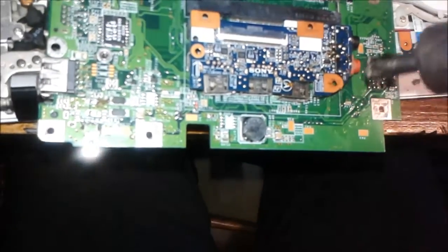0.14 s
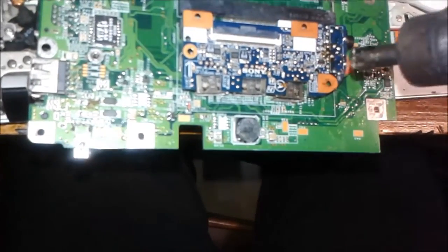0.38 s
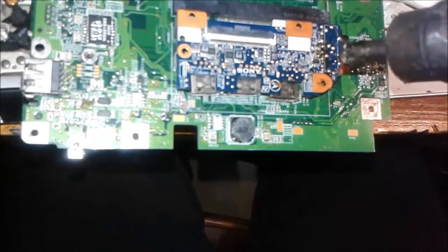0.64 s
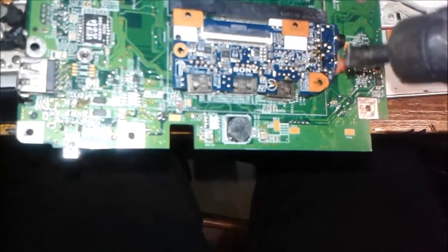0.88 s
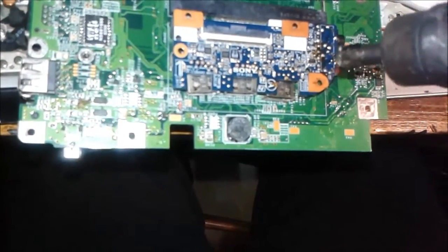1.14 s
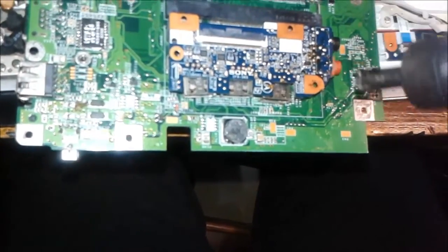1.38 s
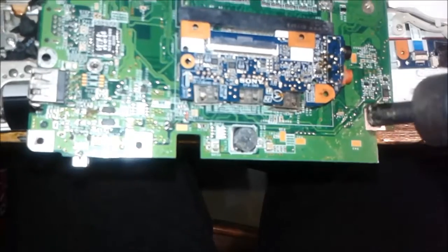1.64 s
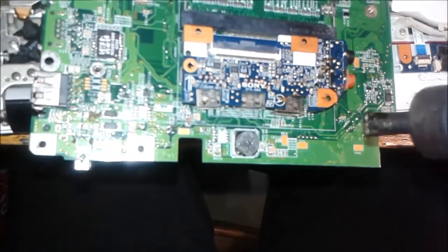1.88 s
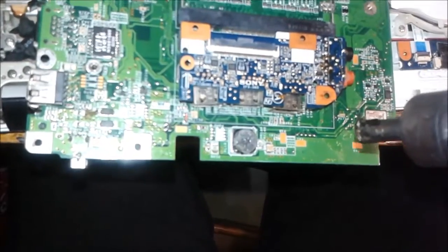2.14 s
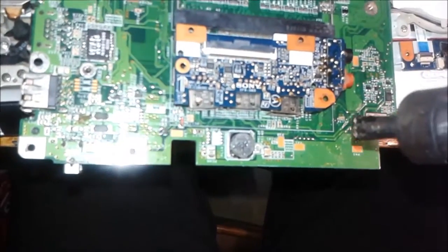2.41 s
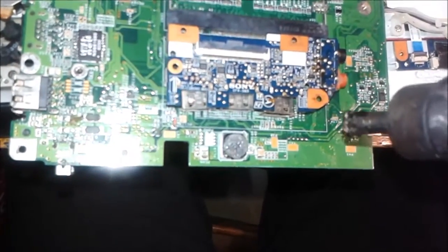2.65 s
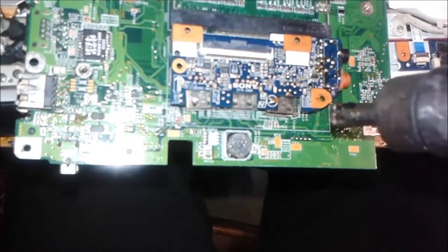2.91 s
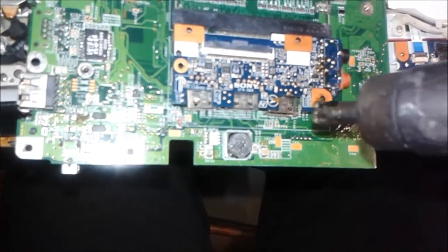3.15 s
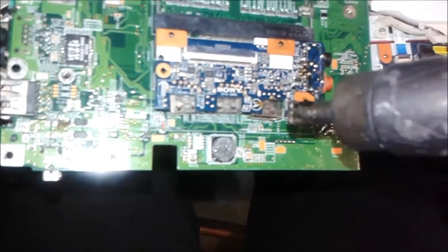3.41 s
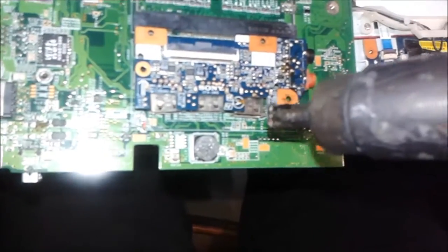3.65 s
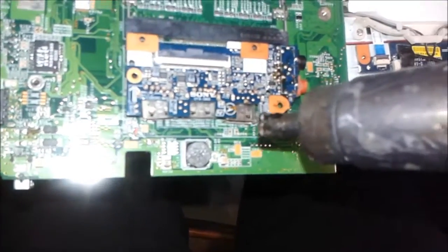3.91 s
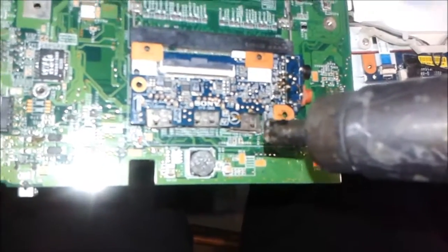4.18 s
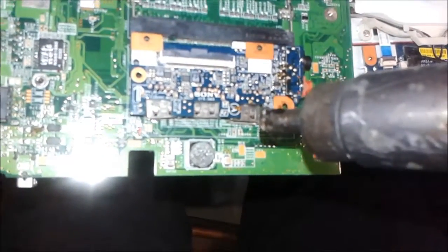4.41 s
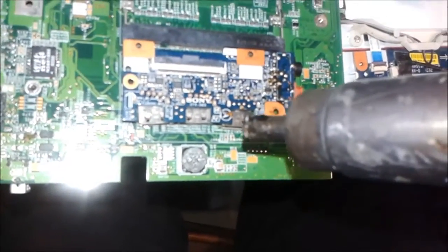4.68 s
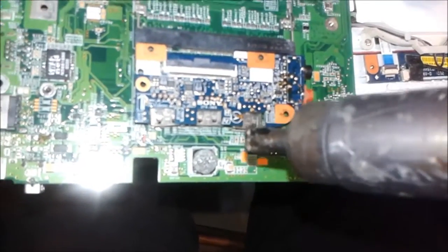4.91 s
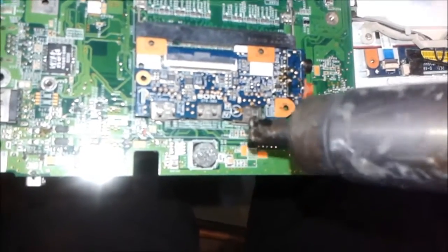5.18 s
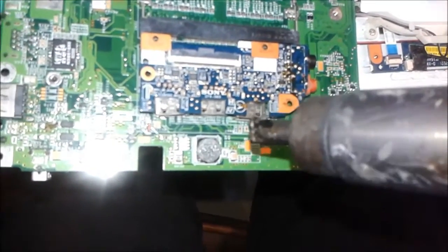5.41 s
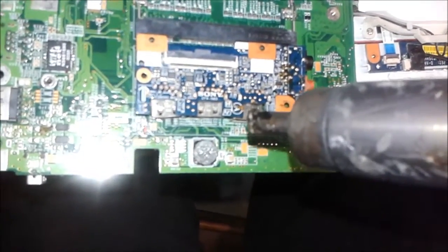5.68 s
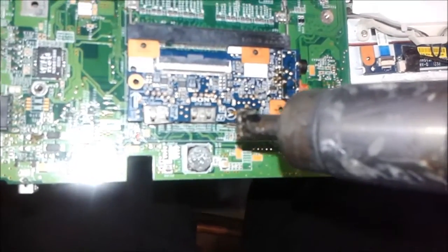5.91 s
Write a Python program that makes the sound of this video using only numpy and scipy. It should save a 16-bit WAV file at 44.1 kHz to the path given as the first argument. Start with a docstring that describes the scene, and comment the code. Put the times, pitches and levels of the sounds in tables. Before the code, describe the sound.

Constant airy rush and sharp hiss from a hot air blower, with deepening fan hum, thin whine, and increasingly frequent raspy buzzing bursts.

```python
"""Over a circuit board, close to a small microphone, a hot air gun is held in the hand. The unbalanced fan
in its handle hums at its turn rate and whines on higher multiples of it; turbulent air, modelled as coloured
noise, rushes through the housing and hisses at the nozzle and the board. As the hand moves in, the hum
grows, and with each tremble of the hand a loose part, struck once per turn of the fan, buzzes through its
resonances."""
import sys
import numpy as np
from scipy import signal
from scipy.fft import rfft, irfft, next_fast_len
from scipy.io import wavfile
from scipy.ndimage import uniform_filter1d, map_coordinates

SR = 44100
rng = np.random.default_rng(int(sys.argv[2]) if len(sys.argv) > 2 else 0)


def wav_record(signal):
    """Record a signal, one row per channel, as 16-bit PCM in the file named by sys.argv[1]."""
    frames = np.transpose(np.atleast_2d(signal))
    bounded = np.clip(frames, -1, 1)
    # unit amplitude maps onto the largest positive 16-bit level
    quanta = np.round(bounded * 32767).astype(np.int16)
    wavfile.write(sys.argv[1], SR, quanta)


def level_to_linear(level):
    """Convert decibel levels to linear amplitude factors, elementwise."""
    exponent = np.asarray(level, float) / 20
    return 10 ** exponent


N = 267113

# Levels are rms re full scale unless marked relative; a bell's length is its half-width at 1/e.

# colour of the rush through the housing: (frequency [Hz], relative density [dB per Hz])
RUSH_COLOUR = [(25, -31), (60, -19), (110, -6.5), (200, -8), (400, -8), (540, -4), (700, 0.5), (1150, -5.5),
               (1550, -2), (1950, -7.5), (2600, -5), (3200, -7), (4000, -19.5), (9000, -57)]
# colour of the jet leaving the nozzle: (frequency [Hz], relative density [dB per Hz])
JET_COLOUR = [(1500, -16.5), (2500, -1.5), (3400, -5.5), (4100, 2.5), (4800, -2.5), (5500, -4.5),
              (6500, -3), (9000, -61)]
# colour of the hiss where the jet meets the board: (frequency [Hz], relative density [dB per Hz])
HISS_COLOUR = [(4000, -39), (5000, -24), (5900, -9), (6300, -3), (6650, 5.5), (7200, -0.5), (7700, -10.5),
               (8500, -16), (9050, -21.5), (9500, -42.5), (12000, -19.5)]
# colour of a low draught that fades as the handle comes near: (frequency [Hz], relative density [dB per Hz])
DRAUGHT_COLOUR = [(120, -16), (220, -7), (520, -3.5), (800, -14.5)]
# air bands that shift as the handle comes near:
# (frequency [Hz], width per stage [Hz], level at the mean hum [dB], slope [dB per dB of hum])
AIR_SHIFTS = [(2754, 650, -55, 0.5), (3446, 300, -50, -.5), (5780, 630, -45.5, 1)]
# strength of the jet at the microphone as the nozzle sweeps the board: (time [s], relative level [dB])
NOZZLE_SWEEP = [(0, -1.5), (.22, -1.5), (.7, 1.5), (1.35, 2), (1.77, -1.5), (2.27, -3.5), (2.6, -2.5),
                (2.95, -2.5), (3.44, -1), (3.96, 1), (4.6, 1), (5.3, 0.5), (6.06, 0)]
# the hiss sinks for a moment: (time [s], change [dB], length [s])
HISS_SAG = (5.08, -5, 0.27)
# levels at a sweep of 0 dB and the mean hum [dB]
RUSH_DB, JET_DB, HISS_DB, DRAUGHT_DB = -32.5, -36.5, -31, -47.5
RUSH_FOLLOWS_SWEEP, HISS_FOLLOWS_SWEEP = 0.41, 0.89  # dB per dB of sweep
RUSH_FOLLOWS_HUM, DRAUGHT_FOLLOWS_HUM = 0.16, -0.87  # dB per dB of hum

# a dull bump as the hum jumps up: (time [s], frequency [Hz], peak level [dB], length [s])
DULL_BUMP = (3.848, 80, -30.5, .008)

# trembles of the hand that set the part buzzing, each level that of a steady buzz before the swell:
# (time [s], length [s], ring level [dB], tick level [dB], sizzle level [dB])
HAND_TREMBLES = [(0.988, 0.075, -56, -38, -32.5), (3.784, 0.027, -34, -32, -31.5),
                 (4.068, 0.046, -36.5, -35, -44), (4.329, 0.018, -34, -33, -34),
                 (4.44, 0.03, -36, -36, -40), (4.572, 0.057, -31, -29.5, -28),
                 (4.697, 0.048, -30, -32, -28), (4.79, 0.038, -33, -42, -30),
                 (4.896, 0.056, -27.5, -29.5, -29.5), (5.05, 0.075, -26, -25.5, -28),
                 (5.195, 0.048, -29.5, -33, -32), (5.29, 0.056, -30, -36, -35),
                 (5.389, 0.04, -28.5, -32, -26), (5.494, 0.036, -27, -28.5, -24),
                 (5.64, 0.041, -27.5, -28.5, -27), (5.736, 0.049, -27.5, -29, -24.5),
                 (5.813, 0.05, -31, -36, -41), (5.893, 0.048, -29.5, -28.5, -24.5),
                 (6.009, 0.066, -27.5, -27.5, -24)]
# resonances of the loose part, lowest group: (frequency [Hz], width [Hz], relative level [dB])
RING_MODES = [(3835, 50, -6), (3953, 20, 2), (4060, 80, -7), (4170, 100, 0)]
# middle group: (frequency [Hz], width per stage [Hz], relative level per stage [dB])
TICK_MODES = [(3070, 760, -0.5), (5490, 1950, 3.5)]
# highest group: (frequency [Hz], width per stage [Hz], relative level per stage [dB])
SIZZLE_MODES = [(6680, 1440, 4), (8440, 300, -4.5)]
# housing that passes the ring on, higher once the handle has turned; one list before, one after:
# (frequency [Hz], width per stage [Hz], relative level per stage [dB])
HOUSING_MODES = [
    [(3990, 480, 0)],
    [(4130, 520, 0)],
]
# where in the turn the part strikes, later as the handle tilts: (time [s], share of a turn after the hum's crest)
STRIKE_POINT = [(1, .27), (4.9, .4), (5.0, .49), (6.06, .5)]

# speed of the fan: (time [s], rate [turns per s])
FAN_SPEED = [(0, 134.1), (1.15, 134.1), (1.5, 133.8), (2.3, 133.75), (2.8, 133.85), (3.3, 134.0),
             (3.8, 134.18), (4.2, 134.23), (4.75, 134.15), (5.1, 134.2), (6.06, 133.9)]
# shifts of grip that bend the pitch of the hum for a moment: (time [s], bend [Hz], length [s])
GRIP_SHIFTS = [(3.874, 5, 0.0057), (4.577, -2, 0.014), (4.99, 4, 0.0181), (5.202, -0.5, 0.07),
               (5.402, 7, 0.019)]
# the handle comes nearer; hum before hold and swells: (time [s], level [dB])
HANDLE_NEARNESS = [(0, -42.5), (1.0, -38), (1.4, -40), (1.62, -35.5), (2.44, -28), (3.65, -28),
                   (3.8, -25.5), (4.3, -27), (6.06, -26.5)]
# a firmer hold passes on more hum: (start [s], end [s], lift [dB], grasp length [s], release length [s])
FIRM_HOLD = (3.85, 5.43, 3.35, 0.014, 0.017)
# the hum swells briefly: (time [s], lift [dB], length [s])
HUM_SWELLS = [(1.202, 4.5, .06), (4.06, 3, 0.039), (4.33, 3, .04), (4.435, 2.5, 0.032), (4.543, 3.5, 0.028),
              (4.899, 1.5, .06), (5.248, 2, 0.19)]
# the overtones flare: (time [s], length [s], lift of the second [dB], lift of the third [dB])
OVERTONE_FLARES = [(2.517, 0.033, 0, 11.5), (2.697, 0.091, 5.5, 1), (4.422, .04, 4, -4),
                   (4.65, 0.11, 3.5, 5), (4.977, 0.03, 12, 10), (5.252, 0.12, 10.5, 4.5),
                   (5.257, 0.029, 0.5, 8), (5.394, 0.019, 10, -2), (5.127, .07, -1, 7), (5.62, .05, 2, 4),
                   (5.75, 0.48, 4, 9)]
# whine of blades and motor: (multiple of the turn rate, family 0 lower or 1 upper, level re its family [dB])
WHINE_TONES = [(12, 0, -12), (16, 0, 0), (17, 1, -16), (18, 0, -11), (20, 1, 2), (24, 1, -16)]
# colour of a rough murmur that comes with the second overtone: (frequency [Hz], relative density [dB per Hz])
MURMUR_COLOUR = [(230, -40), (280, -6), (300, 0), (335, -8), (420, -40)]
SECOND_DB, THIRD_DB, FIFTH_DB = -51, -52, -54  # overtones at the mean hum, before flares and wobble
OVERTONE_FOLLOWS, FIFTH_FOLLOWS, UPPER_FOLLOWS = 0.52, 1.1, 0.68  # dB per dB of hum
LOWER_DB, UPPER_DB, WHINE_RISE_DB_PER_S = -47.5, -53, 1.54  # whine families: references, steady rise
# the handle turns; the lower whine comes forward, then sags
TURN_S, TURN_LENGTH_S, TURN_DB, TURNED_SAG_DB_PER_S = 5.15, 0.21, 7, 3.5


def unit(x):
    """Normalisation of signal power: scaled to rms 1."""
    return x / np.sqrt(np.mean(x ** 2) + 1e-20)


def curves(rows):
    """Linear interpolation in time: one value per sample for each column after the time."""
    s, *columns = np.transpose(rows)
    return [np.interp(np.arange(N) / SR, s, column) for column in columns]


def bell(s, length):
    """Gaussian envelope: a smooth rise and fall around s."""
    return np.exp(-((np.arange(N) / SR - s) / length) ** 2)


def step(s, length):
    """Hyperbolic-tangent transition: a smooth change from 0 to 1 around s."""
    return .5 + .5 * np.tanh((np.arange(N) / SR - s) / length)


def wobble(rate):
    """Band-limited fluctuation: a smooth curve through random knots, rate of them a second."""
    knots = rng.standard_normal(int(N * rate / SR) + 4)
    return map_coordinates(knots, [np.arange(N) * rate / SR])


def filtered(x, response):
    """Linear filtering: the spectrum of x times a complex response of frequency."""
    m = next_fast_len(N + SR // 2)
    return irfft(rfft(x, m) * response(np.fft.rfftfreq(m, 1 / SR)), m)[:N]


def modes(table):
    """Modal superposition: the causal response of a set of damped resonances."""
    return lambda f: sum(level_to_linear(db) * 1j * f * w / (c * c - f * f + 1j * f * w) for c, w, db in table)


def turbulence(spectrum, patchy_db):
    """Turbulent flow as broadband noise: random patches in time and frequency, coloured, rms 1."""
    z = signal.stft(rng.standard_normal(N), nperseg=512)[2]
    field = uniform_filter1d(rng.standard_normal(z.shape), size=6, axis=0)
    field = uniform_filter1d(field, size=12, axis=1)
    noise = signal.istft(z * level_to_linear(patchy_db * unit(field)), nperseg=512)[1][:N]
    hz, db = np.transpose(spectrum)
    return unit(filtered(noise, lambda f: level_to_linear(np.interp(np.log(f + 1), np.log(hz), db))))


def handle():
    """Nearness and contact set the transmission: slow hum level in dB, with the firmer hold."""
    start, end, lift_db, grasp, release = FIRM_HOLD
    held = step(start, grasp) * (1 - step(end, release))
    return curves(HANDLE_NEARNESS)[0] + lift_db * held


def shake(turns):
    """Frequency modulation: the passed-on turns are pushed ahead or back at each shift of grip."""
    bend_hz = sum(hz * bell(s, length) for s, hz, length in GRIP_SHIFTS)
    return turns + np.cumsum(bend_hz) / SR


def air(turns, slow_db):
    """Flow noise: rush, jet, hiss and draught, of which the first three throb with each turn of the fan."""
    change_db = slow_db - slow_db.mean()
    sweep_db = curves(NOZZLE_SWEEP)[0]
    sag_s, sag_db, sag_length = HISS_SAG
    throb = np.cos(2 * np.pi * turns - 3.4)

    rush_db = RUSH_DB + RUSH_FOLLOWS_SWEEP * sweep_db + RUSH_FOLLOWS_HUM * change_db
    rush = level_to_linear(rush_db + 0.39 * throb) * turbulence(RUSH_COLOUR, patchy_db=0.83)
    jet = level_to_linear(JET_DB + sweep_db + 0.55 * throb) * turbulence(JET_COLOUR, patchy_db=0.8)
    draught_db = DRAUGHT_DB + sweep_db + DRAUGHT_FOLLOWS_HUM * change_db
    draught = level_to_linear(draught_db) * turbulence(DRAUGHT_COLOUR, patchy_db=3.0)
    hiss_db = HISS_DB + HISS_FOLLOWS_SWEEP * sweep_db + sag_db * bell(sag_s, sag_length)
    hiss_db = hiss_db + 0.2 * throb + 0.13 * wobble(9.2)
    hiss = level_to_linear(hiss_db) * turbulence(HISS_COLOUR, patchy_db=0.94)

    sound = rush + jet + draught + hiss
    for hz, width, db, follows in AIR_SHIFTS:
        # two equal resonant stages in series
        band = unit(filtered(rng.standard_normal(N), lambda f: modes([(hz, width, 0)])(f) ** 2))
        sound += level_to_linear(db + follows * change_db) * band
    return sound


def bump():
    """Impulse of low frequency: one push, a cosine under a Gaussian envelope."""
    s, hz, db, length = DULL_BUMP
    return level_to_linear(db) * bell(s, length) * np.cos(2 * np.pi * hz * (np.arange(N) / SR - s))


def buzz(turns):
    """Periodic impact excitation: a scratchy contact once a turn rings the part, with a dull inward knock."""
    t = np.arange(N) / SR
    late = turns - curves(STRIKE_POINT)[0] - .015 * wobble(130)
    into_turn = late % 1
    # each turn strikes with its own force
    turn_number = np.clip(late, 0, None).astype(int)
    force = level_to_linear(0.59 * rng.standard_normal(N // 100)[turn_number])
    stroke = force * into_turn * np.exp(-into_turn / 0.096)
    # each strike is one click inside a short scrape that swells up to it and dies after it
    from_strike = (late + .5) % 1 - .5
    scrape = force * np.exp(-((from_strike + .03) / .11) ** 2)
    click = force * (np.diff(np.floor(late), prepend=0) > 0)
    contact = -unit(click) + .25 * unit(scrape * rng.standard_normal(N))
    contact = uniform_filter1d(contact, size=4)  # a contact of finite length is duller on top

    sound = np.zeros(N)
    turned = step(TURN_S, TURN_LENGTH_S)
    # (modes, share of the tremble's length, stages): the brighter groups need a firmer contact,
    # so their swells are narrower; with more stages the ring builds up gradually
    groups = [(RING_MODES, .8, 1), (TICK_MODES, .5, 3), (SIZZLE_MODES, .7, 3)]
    for column, (table, reach, stages) in enumerate(groups):
        is_ring = table is RING_MODES
        swell = np.zeros(N)
        for s, length, *levels_db in HAND_TREMBLES:
            swell += level_to_linear(levels_db[column]) * np.exp(-np.abs((t - s) / (reach * length)) ** 3.7)
        for housing, share in zip(HOUSING_MODES, (1 - turned, turned)):
            def passed(f):
                ringing = modes(table)(f) ** stages
                return ringing * modes(housing)(f) ** 2 if is_ring else ringing

            steady_rms = np.sqrt(np.mean(filtered(contact, passed) ** 2))
            sound += filtered(share * swell * contact, passed) / steady_rms
        if is_ring:
            sound -= level_to_linear(-13) * swell * unit(stroke - stroke.mean())  # the inward knock
    return sound


def tone(turns, multiple, db):
    """Harmonic of rotation: a cosine of rms level db whose phase wanders slightly."""
    phase = 2 * np.pi * multiple * turns + 0.054 * np.sqrt(multiple) * wobble(30)
    return np.sqrt(2) * level_to_linear(db) * np.cos(phase)


def fan(turns, bent, slow_db):
    """Rotor imbalance hums once a turn; blade and motor-pole passage whines on higher multiples."""
    t = np.arange(N) / SR
    change_db = slow_db - slow_db.mean()
    hum_db = slow_db + sum(db * bell(s, length) for s, db, length in HUM_SWELLS)
    second_db = SECOND_DB + OVERTONE_FOLLOWS * change_db
    third_db = THIRD_DB + OVERTONE_FOLLOWS * change_db
    for s, length, second_lift, third_lift in OVERTONE_FLARES:
        flare = bell(s, length)
        second_db = second_db + second_lift * flare
        third_db = third_db + third_lift * flare

    sound = tone(bent, 1, hum_db + 0.21 * wobble(25))
    sound += tone(bent, 2, second_db + 1.7 * wobble(16))
    sound += tone(bent, 3, third_db + 1.5 * wobble(20))
    sound += tone(bent, 5, FIFTH_DB + FIFTH_FOLLOWS * change_db + 3 * wobble(8))
    sound += level_to_linear(second_db - 8) * turbulence(MURMUR_COLOUR, patchy_db=0.0)

    rise_db = WHINE_RISE_DB_PER_S * t
    turned_db = step(TURN_S, TURN_LENGTH_S) * (TURN_DB - TURNED_SAG_DB_PER_S * (t - TURN_S))
    families_db = LOWER_DB + rise_db + turned_db, UPPER_DB + rise_db + UPPER_FOLLOWS * change_db
    for multiple, family, db in WHINE_TONES:
        sound += tone(turns, multiple, families_db[family] + db + 0.76 * wobble(7.6))
    return sound


def scene():
    """Superposition of phase-locked sources: the fan's turning ties hum, throb and buzz together."""
    turns = np.cumsum(curves(FAN_SPEED)[0]) / SR
    bent, slow_db = shake(turns), handle()
    mix = air(bent, slow_db) + bump() + buzz(bent) + fan(turns, bent, slow_db)
    return mix[None]


def low_pass(x):
    """Removes everything above the highest recorded frequency."""
    return signal.sosfilt(signal.butter(12, 11630, fs=SR, output="sos"), x)


def record(dry):
    """Low-pass filtering: the treble falls away above about 9 kHz."""
    heard = filtered(dry[0], lambda f: 1 / np.sqrt(1 + (f / 9300) ** 8))
    return low_pass(heard[None])


dry = scene()
out = record(dry)
wav_record(out)
```